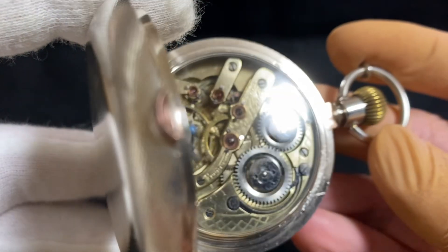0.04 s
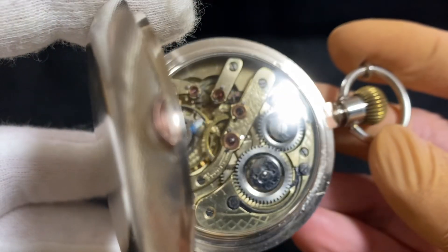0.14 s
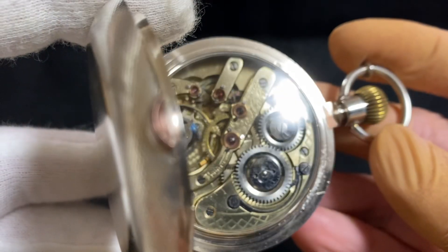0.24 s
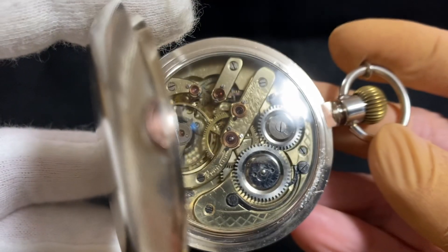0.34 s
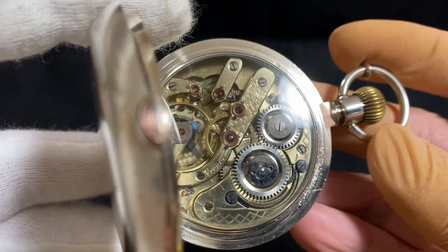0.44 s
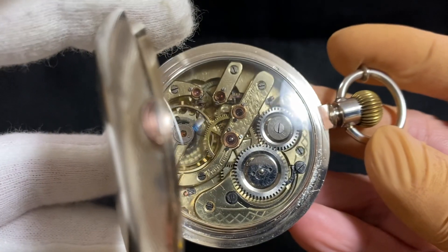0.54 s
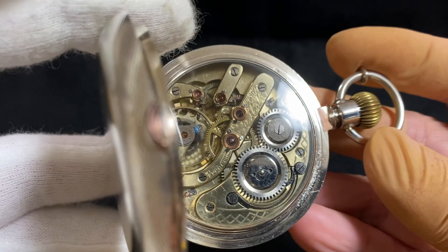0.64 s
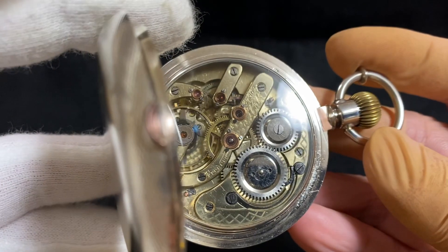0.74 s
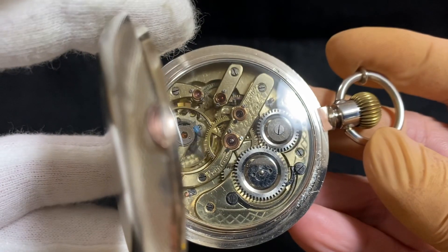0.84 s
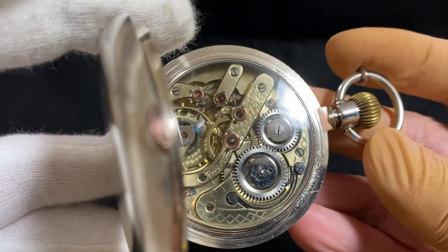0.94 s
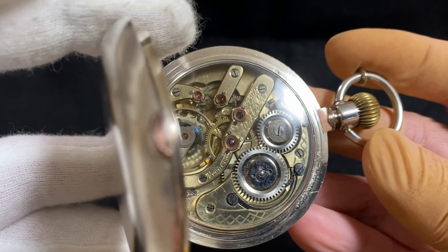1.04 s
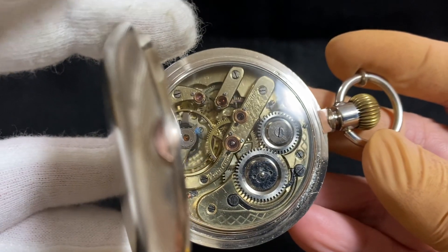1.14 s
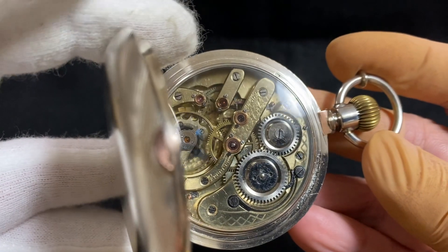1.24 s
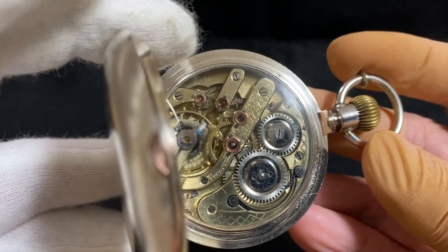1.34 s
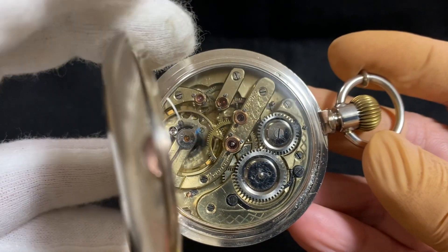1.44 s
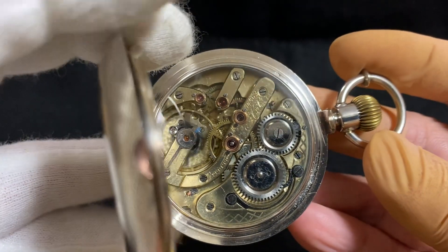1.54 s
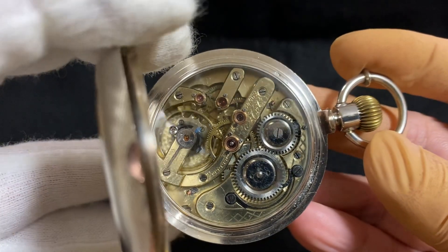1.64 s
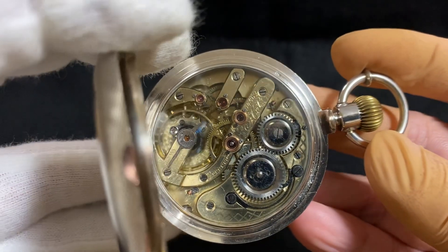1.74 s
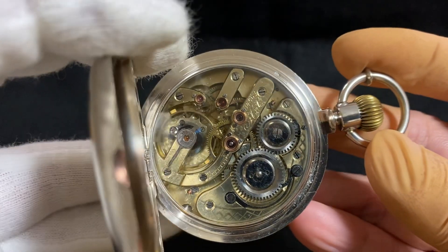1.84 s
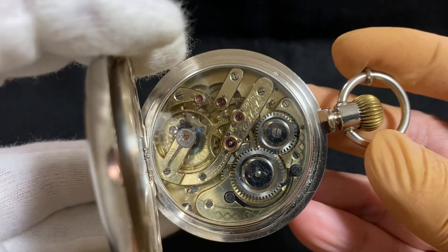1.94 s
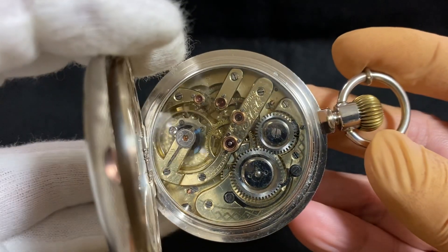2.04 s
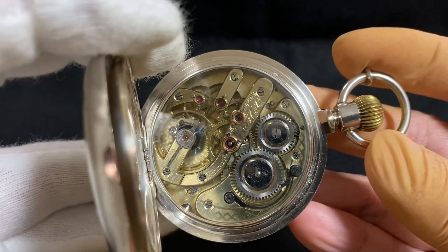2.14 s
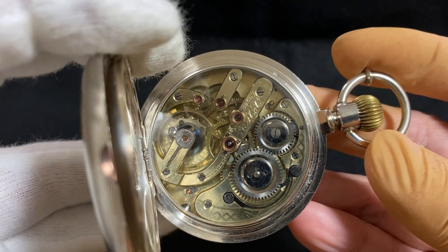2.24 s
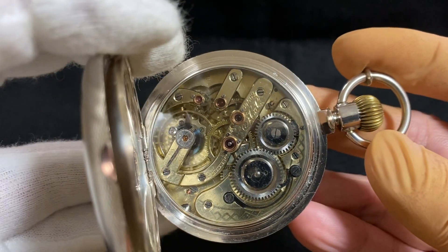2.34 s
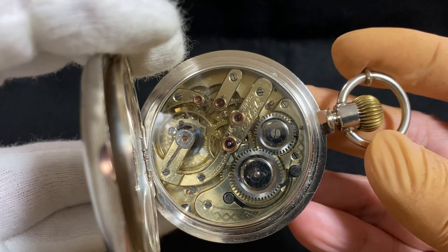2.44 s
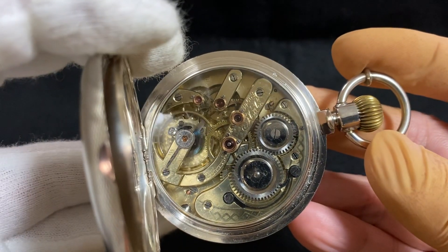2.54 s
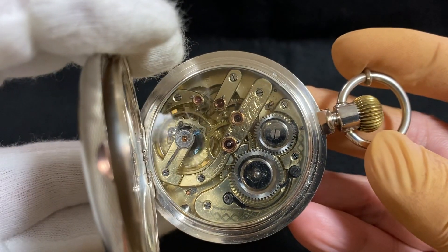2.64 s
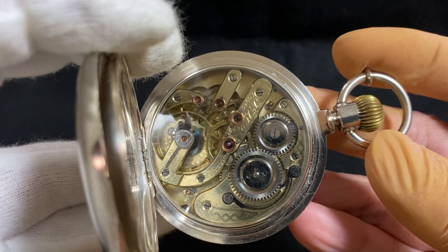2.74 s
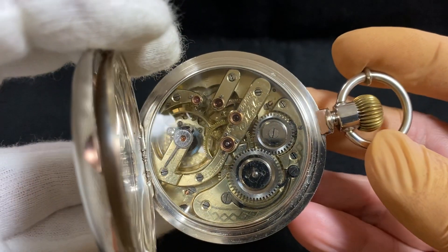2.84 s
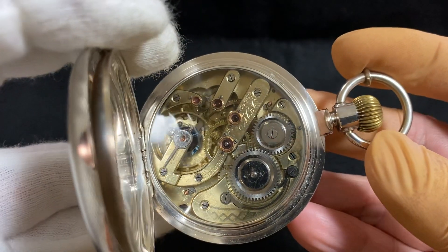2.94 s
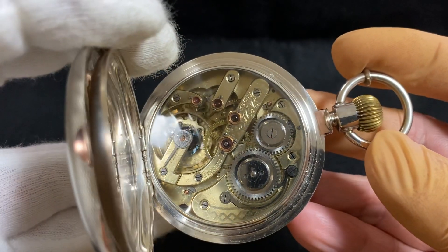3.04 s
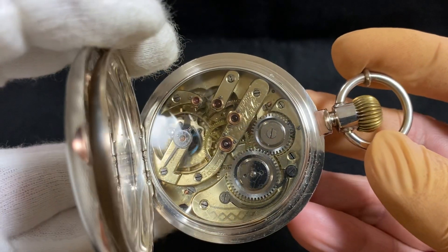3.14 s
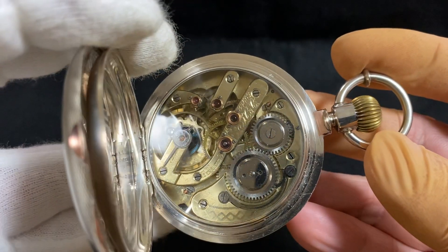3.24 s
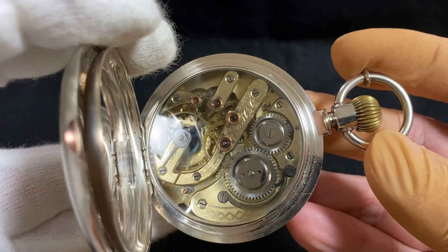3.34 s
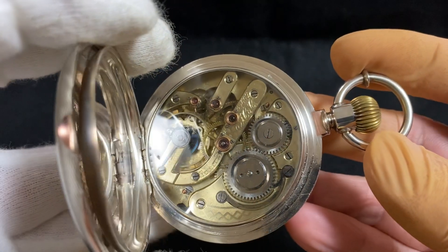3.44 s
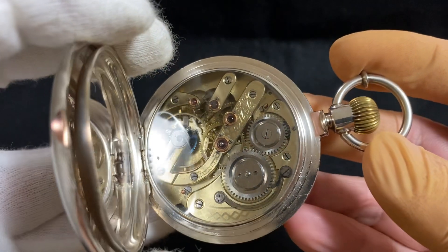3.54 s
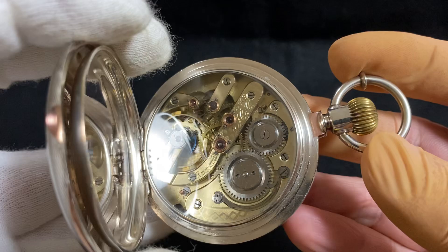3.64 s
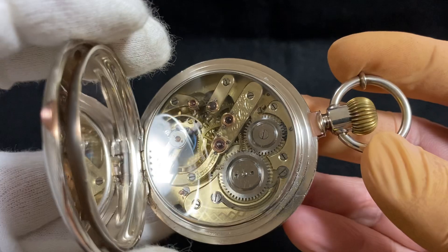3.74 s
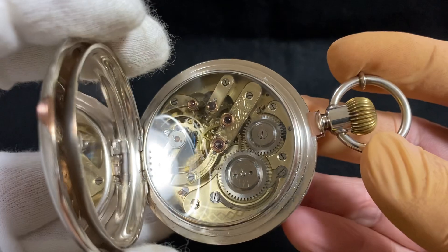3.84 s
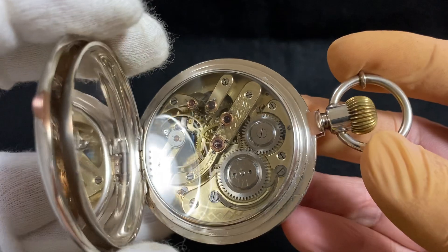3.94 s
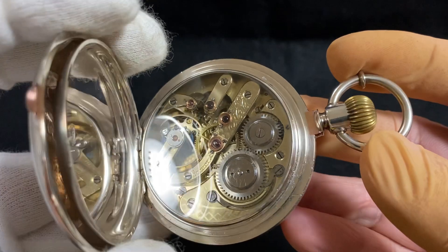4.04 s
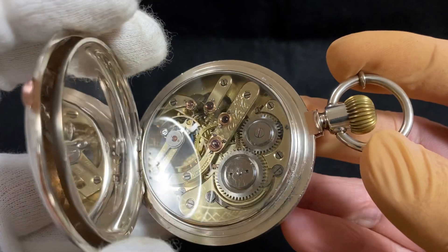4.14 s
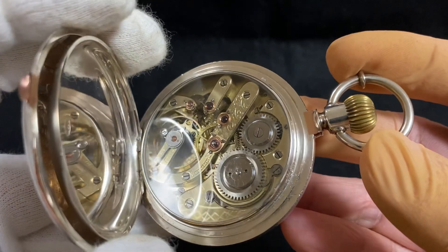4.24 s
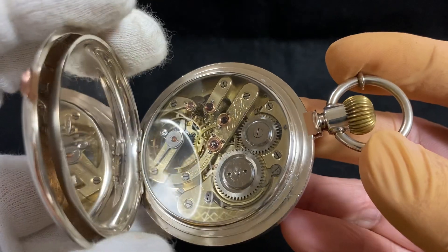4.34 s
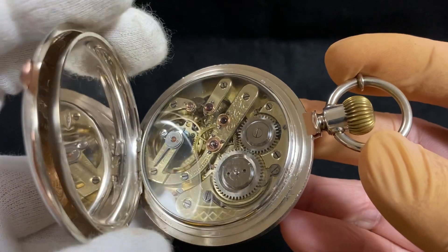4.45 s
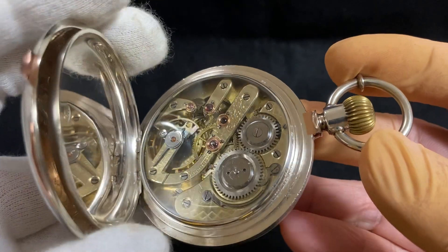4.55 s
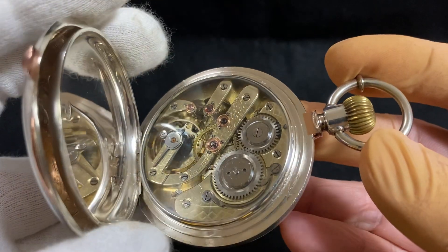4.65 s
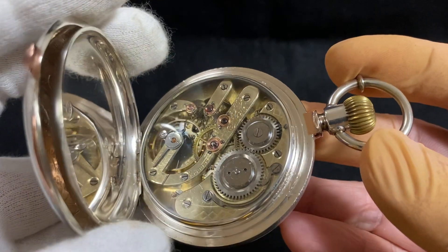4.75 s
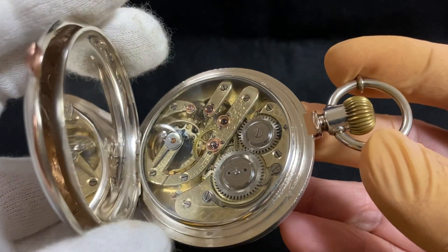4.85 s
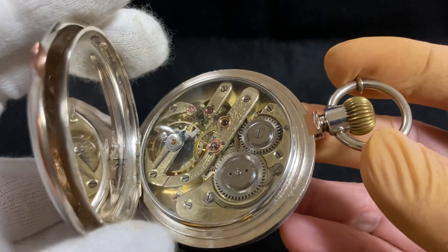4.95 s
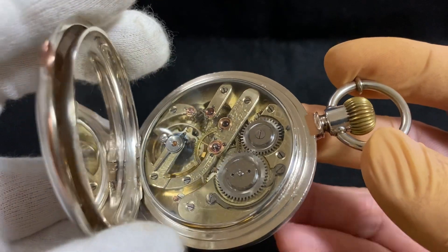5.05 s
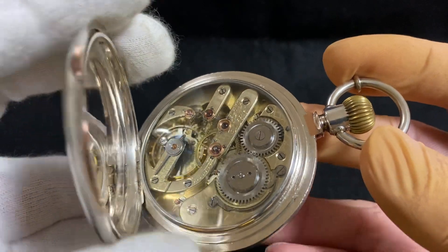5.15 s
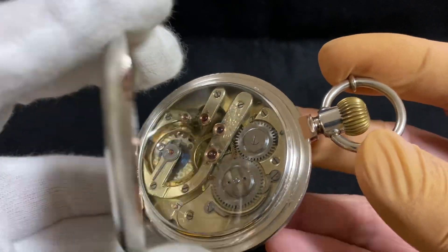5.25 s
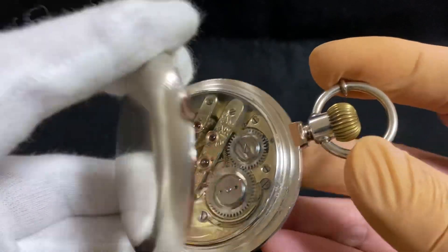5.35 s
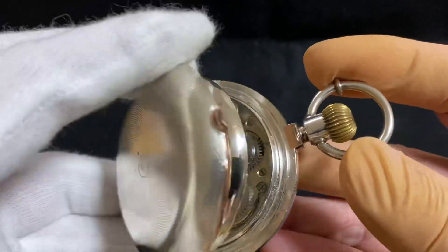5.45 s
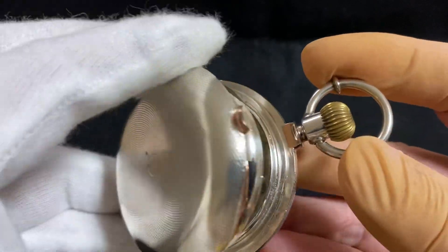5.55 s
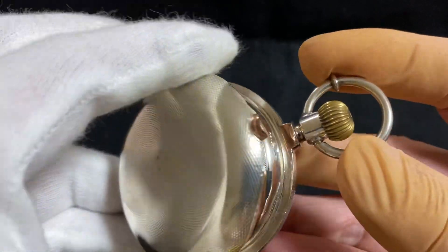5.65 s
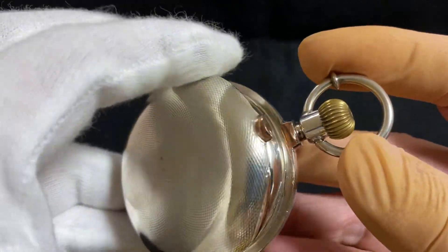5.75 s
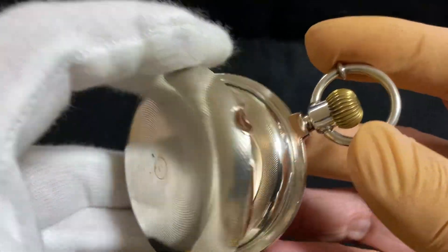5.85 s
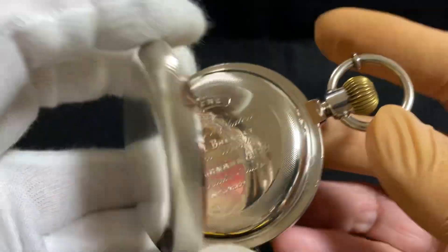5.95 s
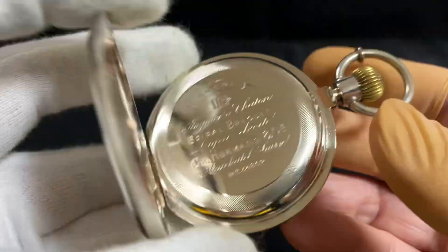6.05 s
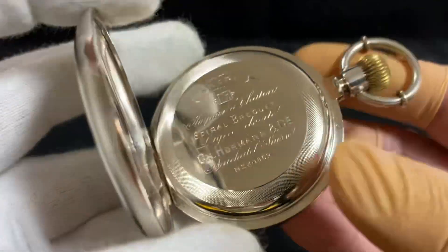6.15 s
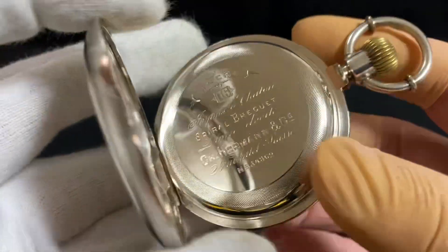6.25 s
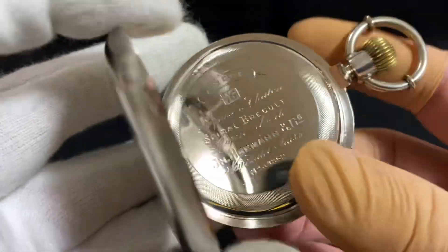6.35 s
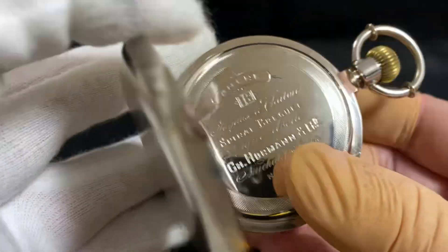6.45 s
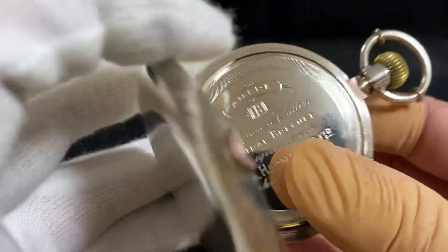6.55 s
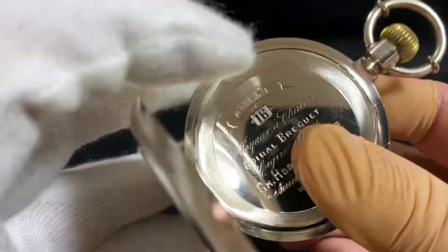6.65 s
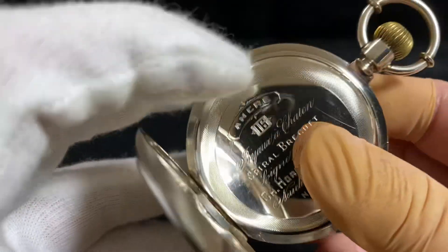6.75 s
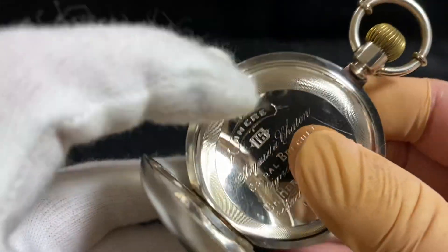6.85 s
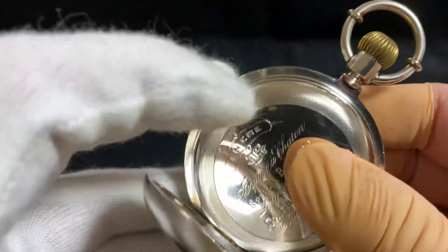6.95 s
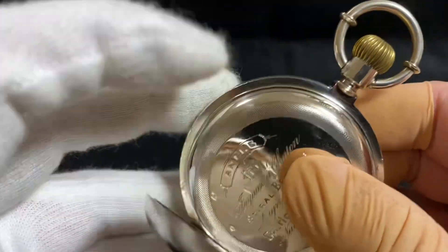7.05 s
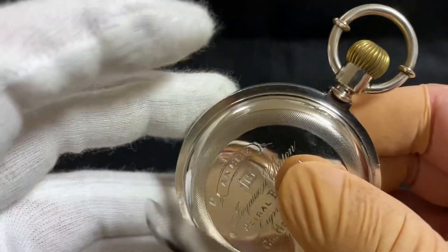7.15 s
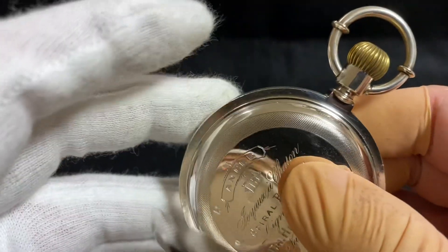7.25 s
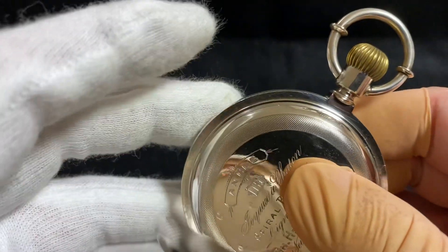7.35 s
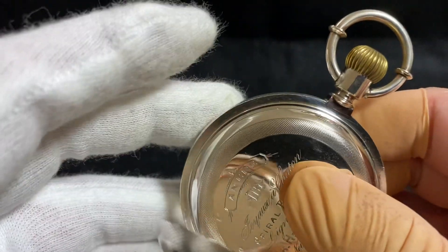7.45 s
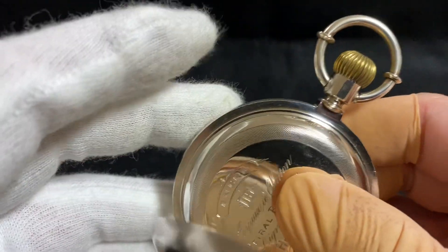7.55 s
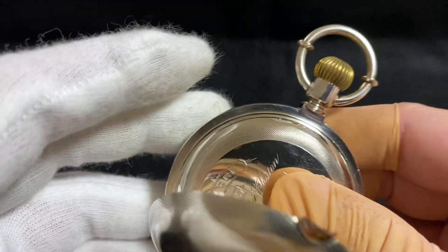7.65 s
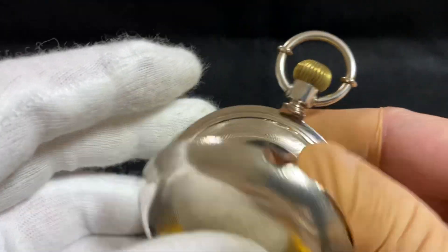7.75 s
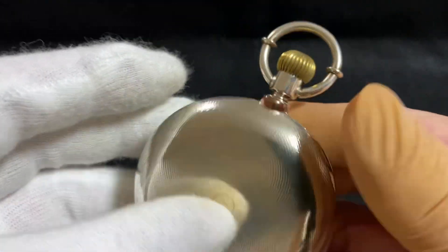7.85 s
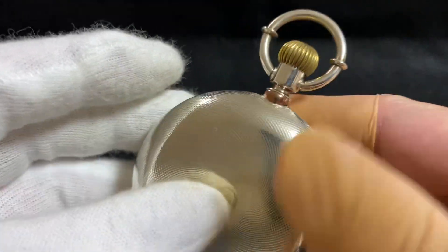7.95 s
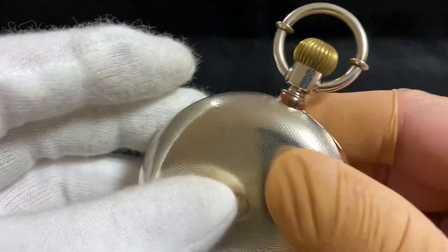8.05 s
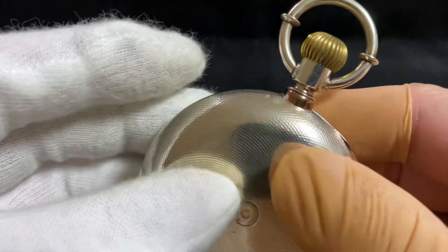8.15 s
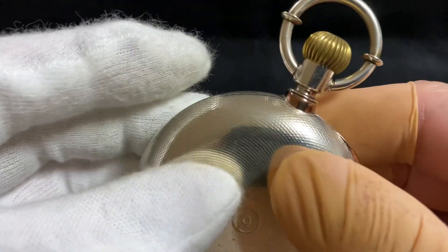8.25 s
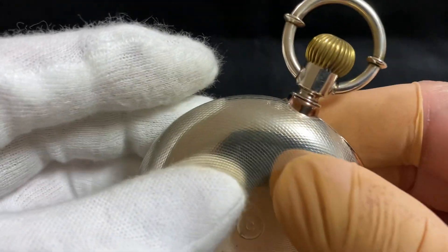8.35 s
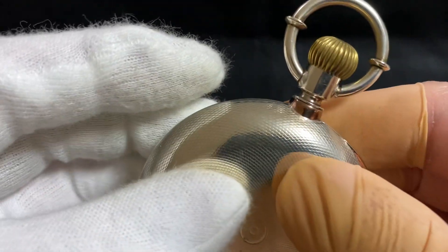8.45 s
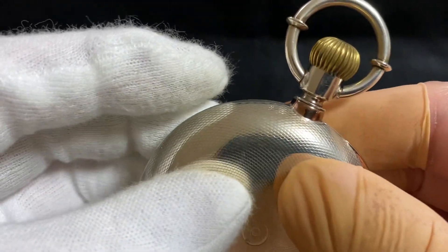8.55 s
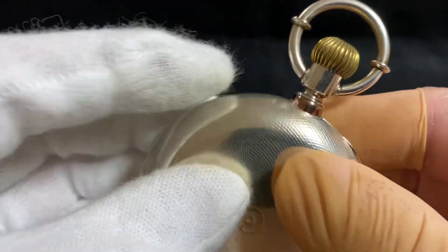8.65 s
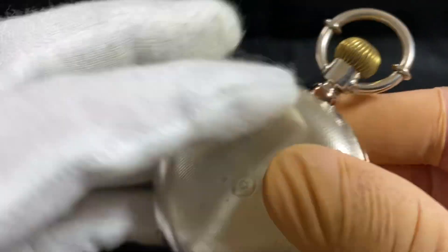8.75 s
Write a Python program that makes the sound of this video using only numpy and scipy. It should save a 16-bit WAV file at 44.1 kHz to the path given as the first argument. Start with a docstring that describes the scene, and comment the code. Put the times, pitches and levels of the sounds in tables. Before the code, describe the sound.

In a quiet room, a low appliance hum near 100 Hz and a soft bassy rush continue throughout. A pocket watch held close to a two-port phone microphone ticks faintly, about five thin, bright beats per second, slightly uneven in pairs. Around 0.45 s there is a slight, dull touch on the case. Ticking alone follows until a metallic click at 5.2 s, then a loud, hard cover snap at 5.6 s with a tight cluster of clacks. A crisp knock comes at 6.1 s, with small taps to 7.0 s and light glove rubbing, strongest near 6.5 s. At 7.24 s a heavy, fuller snap lands with a thud in the palm. A brief scratchy scrape comes around 7.7-7.8 s and a softer one near 8.1 s; a firm, thumping snap hits at 8.4 s, then tiny clicks and rubbing end it at 8.8 s. Snaps leave a short, faint room tail.

```python
"""A quiet room, a pocket watch held close to a phone with two microphone ports, for 8.8 s.
From the start an appliance hums as wavering sines over a bassy rush of shaped noise; the escapement
ticks five times a second, each beat a noise crack and ringing modes. Two early touches on the case;
from 5.2 s gloved fingers knock it and snap its covers, hardest near 5.6, 7.2 and 8.4 s. Rubbing,
grainy noise through case resonances, comes and goes from 5.35 s. A room tail follows the watch."""
import sys
import numpy as np
from scipy import signal
from scipy.fft import rfft, irfft, next_fast_len
from scipy.io import wavfile
from scipy.ndimage import uniform_filter1d

SR = 44100
rng = np.random.default_rng(int(sys.argv[2]) if len(sys.argv) > 2 else 0)


def to_wav(sig):
    """Store sig (one row per channel, or 1-D mono) as 16-bit WAV at the path in sys.argv[1].

    Samples outside -1..1 are clipped; the rate is SR.
    """
    pcm = np.clip(np.atleast_2d(sig), -1, 1) * 32767
    pcm = np.round(pcm).astype(np.int16)
    wavfile.write(sys.argv[1], SR, pcm.T)  # frames by channels


N = 388080

# All table levels are relative, ahead of the gain in record().
# Appliance lines: pitch_hz, level_db
HUM_LINES = [(48, -64), (99.9, -53), (143.8, -59), (199.8, -63)]
# Spectrum of the room's rush: frequency_hz, level_db
AIR_COLOUR = [(20, -30.5), (45, -14), (83, 0.5), (150, -5.5), (250, -8), (575, -24.5), (940, -23.5),
              (1490, -36), (3190, -44), (7000, -52), (10500, -52), (13000, -53.5), (16500, -64)]
# Ringing modes of the watch plates: pitch_hz, level_db, t60_s (before a closing taper)
PLATE_MODES = [(2900, 0.5, 0.02), (3210, -2, 0.13), (3828, -6, 0.031), (5000, -8.5, 0.03),
               (5160, -3, 0.061), (5550, -13, 0.043), (7180, -6.5, 0.011), (8020, -6, 0.056),
               (9600, -5.5, 0.028), (10320, -2, 0.028), (11150, -7.5, 0.03), (12280, -0.5, .05),
               (13700, -3.5, 0.049), (14600, -6, .04), (15100, -5, 0.055)]
# The two beats: level_db, plate_ring_db, unlocking_click_db, low_body_db
TICK_BEAT = (0, 1, -12.5, -8.5)
TOCK_BEAT = (-2.5, 1, -24.5, -12)
# The watch as it is tilted and covered: time_s, lateness_ms, level_db, plate_ring_db
WATCH_HANDLING = [(0, 0.5, -45.5, -2.5), (1.2, -3.5, -49, 3.5), (1.9, -4.5, -49, 5), (2.8, -1.5, -46, 0),
                  (3.3, -4, -43, -2.5), (4.0, -1, -48.5, 9), (4.5, -0.5, -43.5, 5.5), (4.9, 0.1, -47, 5.5),
                  (5.35, 0.5, -40.5, -3.5), (5.7, -1, -41, -11.5), (6.3, 0.2, -45, 5),
                  (6.85, -3.5, -46, -12), (7.299, -2.5, -48, -9), (7.701, -0.5, -44.5, -12.5),
                  (8.101, -1, -43.5, -21), (8.8, -0.5, -51.5, -13.5)]
# Blows on the case: start_s, level_db, firmness_db, brightness_db, ring_db
CASE_BLOWS = [(.4443, -58, -20, -12, 2), (0.4841, -24, -55, -38, -12), (5.1774, -26.5, -22, -3.5, 3),
              (5.434, -57.5, -17, -7.5, 8.5), (5.606, -24.5, -40, -9, -14), (5.6156, -7.5, -23.5, -8, 1.5),
              (5.6197, -6.5, -22, -7, -24), (5.627, -28, -27, -1, -11), (5.6357, -22.5, -13, -1.5, -9),
              (5.643, -26, -12, -1, -8), (6.0116, -58, -12, -16.5, -1.5), (6.1291, -25, -21, -7.5, -8),
              (6.139, -15.5, -27, -27, -14.5), (6.3795, -40, -19, -16.5, 3), (6.5876, -44, -18, -6.5, -9),
              (6.979, -40, -3.5, -9.5, -15), (7.2308, -41, 1, -13.5, -17), (7.2413, -6.5, 1, -3, -8),
              (7.2496, -25, -2, -11, -7), (7.65, -67, -25, 2.5, -16), (7.6826, -63.5, -30, 4, -19),
              (7.7003, -47.5, -10.5, -7, -13), (7.719, -43, 0, -9, -6), (7.751, -53, -2, 0, -13.5),
              (8.059, -54.5, 11, -4, -12), (8.30, -58.5, 7, -4, -12.5), (8.357, -61, -28.5, 4, -23),
              (8.3804, -16, 18.5, 5, -14.5), (8.391, -42, 17, 2, -11.5), (8.403, -28.5, -2.5, -9.5, -18),
              (8.728, -60.5, -17.5, 6, -19), (8.743, -55, 14, -14.5, -11.5), (8.7712, -61.5, -6, 10.5, -13)]
# Ringing modes of the case: pitch_hz, level_db, t60_s (before a closing taper)
CASE_MODES = [(620, -6.5, 0.015), (945, -5.5, 0.038), (1140, -8, 0.018), (1480, -8.5, 0.02),
              (1690, 3, 0.044), (1990, -4.5, 0.1), (2786, -2, .05), (3060, -2, 0.03), (3380, -7.5, 0.062),
              (3590, -6.5, 0.089), (4280, -17, 0.12), (4820, -5, 0.064), (6200, -14, 0.084),
              (6700, -4.5, 0.11), (7050, 0.5, 0.027), (8480, 0, .03), (9250, -7, 0.097),
              (10300, -11.5, 0.075), (13200, -12, 0.044), (13900, -20, .03), (14520, -12.5, .05)]
# Thud in the palm: pitch_hz, level_db, t60_s (before a closing taper)
HAND_MODES = [(97, -5, .05), (142, -7.5, 0.055), (223, -3.5, 0.026), (350, -3, 0.021), (487, 7, 0.0068)]
# Glove on metal, one list per rub: time_s, level_db, brightness_db
GLOVE_RUBS = [
    [(5.35, -87, -5), (5.6, -82, -1)],
    [(5.9, -95, 11.5), (6.2, -76, -2), (6.42, -79, 1), (6.53, -68.5, -1), (6.6, -82.5, 4),
     (6.7, -77.5, 6.5), (6.76, -93.5, 3.5), (7.0, -81, -3.5), (7.1, -95.5, 13)],
    [(7.58, -94, 12.5), (7.685, -83.5, 8.5), (7.7, -64, -15), (7.815, -65, -10), (7.835, -88.5, 5.5),
     (7.9, -91.5, 7)],
    [(8.0, -96, 8.5), (8.07, -71, -3), (8.15, -86.5, 6), (8.25, -86.5, 9.5), (8.3, -78.5, -18.5),
     (8.37, -89, 5)],
    [(8.6, -97.5, 10.5), (8.68, -80, 14.5), (8.75, -79.5, 7.5), (8.8, -89, 5)],
]
# Resonances of the case under the sliding finger: pitch_hz, level_db
SCRAPE_MODES = [(1305, -1.5), (1600, -4.5), (1900, 3), (2740, -6.5), (3290, 0.5), (4390, -3), (5000, -11.5),
                (5700, -8), (7270, -10)]
# Bands of the room tail, with a narrower one where it lingers: low_hz, high_hz, t60_s, level_db
ROOM_BANDS = [(101, 460, .15, -35.5), (500, 1300, 0.33, -30.5), (1620, 4600, 0.29, -26.5),
              (2700, 3000, 0.33, -32), (4930, 9500, 0.26, -22), (9570, 27000, 0.18, -27)]
# Microphone colour on the close watch: frequency_hz, level_db
MIC_COLOUR = [(30, -30.5), (120, -5), (400, 0.5), (2300, -2.5), (3000, 1), (3500, -9), (4100, -4),
              (5500, -6), (7000, -1), (11500, -5), (15600, -2), (16800, -16)]
# The phone's body hides the watch from the far port: frequency_hz, level_db
BODY_SHADE = [(100, 3), (300, 0), (450, 0), (700, -5), (1200, -7), (2800, -7), (4000, 0)]
# Phase shift of the watch at the far port: frequency_hz, phase_rad
BODY_TURN = [(40, -.2), (250, -.6), (450, -.9), (650, -1.6), (950, .5), (1400, -.8), (2000, -1.3),
             (2800, -.5), (4200, .1), (5500, -.5), (6200, 0)]
# Share of the room's sound common to both ports: frequency_hz, level_db
SHARED_LEVEL = [(150, 0), (300, -4), (450, -12), (700, -6), (1400, -8), (2000, -12), (6000, -4), (7000, 0)]
# Phase shift of that share at the far port: frequency_hz, phase_rad
SHARED_PHASE = [(50, -.3), (150, -.35), (200, .3), (300, -.8), (450, -.6), (650, 2.4), (950, 1.8),
                (1400, 3.2), (2000, 0)]
# Colour of the far port below the split: frequency_hz, level_db
FAR_PORT = [(30, -2), (100, -5.5), (400, -5), (1000, -4), (2800, -6), (4200, -4), (5600, -5)]

LEAD = 441  # samples of room for a filter's rise
RING_S = .1  # longest ring of the watch
AIR_DB = -62.8
SWING_S, FIRST_S = .39783, .1091  # one swing of the balance there and back; first tick before lateness
TOCK_S = .1857  # out of beat: the tock follows the tick sooner than half a swing
UNLOCK_S = .0245  # the fork unlocks this long before the tooth drops
BEAT_SCATTER_DB = 1
RATTLE_S, RATTLE_S_PER_DB = .008, -.00008  # a firm press chokes the rattle sooner
THUD_DB, THUD_SLOPE = -11, .95  # the thud grows with firmness
HOLLOW_DB, HOLLOW_SLOPE = -5, .3  # so does the hollow band under the main ring
THUD_LATE_S = .0018  # the palm answers a moment after the metal
LOW_DB = -7  # the band under the bass peak of a press
TREBLE_DB = -3  # treble against the edge
SCRAPE_WIDTH_HZ = 100
SPLIT_HZ, LAG = 6600, 10  # far-port treble split; its lead in samples
TOP_HZ = 16900  # upper limit of the microphone


def undb(db):
    """Decibels to an amplitude factor."""
    return 10 ** (np.asarray(db) / 20)


def fade(t, t60):
    """Exponential decay, 60 dB down after t60 seconds."""
    return np.exp(-np.log(1000) * t / max(t60, 1e-3))


def shaped(x, points, turn=((1, 0), (2, 0))):
    """Colour by (Hz, dB) points, and turn the phase by (Hz, rad) points, on a log-frequency axis."""
    size = next_fast_len(len(x))
    log_f = np.log(np.arange(size // 2 + 1) * SR / size + 1)

    def curve(pairs):
        hz, value = np.transpose(pairs)
        return np.interp(log_f, np.log(hz), value)

    response = undb(curve(points)) * np.exp(1j * curve(turn))
    return irfft(rfft(x, size) * response, size)[:len(x)]


def unit(x):
    """Scale to an rms of one."""
    return x / np.sqrt(np.mean(x ** 2))


def walk(rate):
    """Random levels, each held 1 / rate s, then smoothed twice into slopes."""
    hold = int(SR / rate)
    steps = np.repeat(rng.standard_normal(N // hold + 1), hold)
    return uniform_filter1d(uniform_filter1d(steps, hold), hold)[:N]


def add(out, s, x):
    """Mix x into out, starting at s seconds."""
    i = int(s * SR)
    out[i:i + len(x)] += x[:N - i]


def modal(modes, scatter_db, beat_hz):
    """One answer of a set of modes, a little different at each blow; split modes of the round case throb."""
    t = np.arange(int(SR * RING_S), dtype=np.float32) / np.float32(SR)
    hz, db, t60 = np.float32(np.transpose(modes))[:, :, None]
    draws = np.float32(rng.standard_normal((len(modes), 3)))
    level_draw, pitch_draw, throb_draw = draws.T[:, :, None]
    throb = np.cos(2 * np.pi * beat_hz * throb_draw * t)
    decay = np.exp(-t * np.float32(np.log(1000)) / t60) * (1 - t / RING_S)
    tone = np.sin(2 * np.pi * hz * (1 + 0.007 * pitch_draw) * t)
    ring = np.sum(undb(db + scatter_db * level_draw) * decay * throb * tone, axis=0)
    return ring / np.abs(ring).max()


def strike(modes, rattle_s, ring_db, colour):
    """A rattle of noise that stops short, and the ring that builds up during it; starts LEAD samples in."""
    t = np.arange(int(SR * RING_S)) / SR
    rattle = rng.standard_normal(len(t)) * undb(-60 * (t / rattle_s) ** 2)
    spectrum = rfft(np.pad(rattle, LEAD))
    power = np.abs(spectrum) ** 2
    # even out the burst's spectrum, so each crack keeps its given colour
    levelling = np.sqrt(power.mean() / uniform_filter1d(power, size=60))
    crack = irfft(spectrum * levelling, len(t) + 2 * LEAD)
    crack[:LEAD] = 0
    ring = (1 - fade(t, rattle_s / 2)) * modal(modes, scatter_db=3, beat_hz=20)
    return shaped(crack + np.pad(2 * undb(ring_db) * ring, LEAD), colour)


def appliance():
    """Motor and mains lines behind the watch: sines that waver a little in level and pitch."""
    t = np.arange(N) / SR
    out = np.zeros(N)
    for hz, db in HUM_LINES:
        level = undb(db - 2.5 + 2.2 * walk(11))
        out += level * np.sin(2 * np.pi * hz * t + 3.1 * walk(7.3))
    return out


def air():
    """The room's steady rush, mostly bass: shaped noise whose level drifts slightly."""
    return undb(AIR_DB + 0.39 * walk(5.3)) * unit(shaped(rng.standard_normal(N), AIR_COLOUR))


def escapement():
    """Each beat is a faint unlocking click, then the drop of the tooth; both thin and bright."""
    out = np.zeros(N)
    when, late_ms, watch_db, watch_ring_db = np.transpose(WATCH_HANDLING)
    for swing in np.arange(FIRST_S, N / SR - SWING_S / 2, SWING_S):
        for s, beat in ((swing, TICK_BEAT), (swing + TOCK_S, TOCK_BEAT)):
            db, ring_db, unlock_db, body_db = beat
            level_scatter, body_scatter, unlock_scatter = BEAT_SCATTER_DB * rng.standard_normal(3)
            drop_db = db + np.interp(s, when, watch_db) + level_scatter
            click_db = drop_db + unlock_db + unlock_scatter
            ring_db = ring_db + np.interp(s, when, watch_ring_db)
            drop_s = s + np.interp(s, when, late_ms) / 1000
            colour = [(1800, body_db - 32.5), (3000, body_db + body_scatter), (5000, -8),
                      (8000, -4.0), (11000, -2.5), (16000, -6)]
            for at, at_db in ((drop_s, drop_db), (drop_s - UNLOCK_S, click_db)):
                blow = strike(PLATE_MODES, 0.0085, ring_db, colour)
                add(out, at - LEAD / SR, undb(at_db) * blow)
    return out


def covers():
    """Knocks and snaps ring the case; a firm press adds bass and a thud through the hand."""
    out = np.zeros(N)
    for s, db, firm_db, bright_db, ring_db in CASE_BLOWS:
        hollow_db = HOLLOW_DB + HOLLOW_SLOPE * firm_db
        colour = [(300, firm_db - 21), (750, firm_db + LOW_DB), (1050, firm_db), (1900, hollow_db),
                  (2900, 0), (5500, bright_db), (11000, bright_db + TREBLE_DB)]
        rattle_s = RATTLE_S + RATTLE_S_PER_DB * firm_db
        add(out, s - LEAD / SR, undb(db) * strike(CASE_MODES, rattle_s, ring_db, colour))
        thud_db = db + THUD_DB + THUD_SLOPE * firm_db
        add(out, s + THUD_LATE_S, undb(thud_db) * modal(HAND_MODES, scatter_db=1, beat_hz=0))
    return out


def glove():
    """Cloth fibres catch on the metal: grainy hiss and lone snags ring the case under a brighter fizz."""
    t = np.arange(N) / SR
    snags = (rng.random(N) < 60 / SR) * rng.exponential(8., N)  # about 60 per second
    grain = (rng.standard_normal(N) + snags) * undb(3 * walk(200) + 1.5 * walk(30))
    rasp = np.zeros(N)
    for hz, db in SCRAPE_MODES:
        b, a = signal.iirpeak(hz, hz / SCRAPE_WIDTH_HZ, SR)
        rasp += undb(db) * signal.lfilter(b, a, grain)
    hiss = unit(shaped(grain, [(700, -30), (1400, 0), (3000, -3), (6000, -8), (9000, -30)]))
    dull = unit(unit(rasp) + undb(-13) * hiss)
    bright = unit(shaped(grain, [(4000, -13), (7000, -5.0), (11000, 3.0), (16000, -9.5)]))
    out = np.zeros(N)
    for rub in GLOVE_RUBS:
        s, db, bright_db = np.transpose(rub)
        edge = np.clip(np.minimum(t - s[0], s[-1] + 0.018 - t) / 0.025, 0, 1)
        fizz = undb(np.interp(t, s, bright_db)) * bright
        out += edge * undb(np.interp(t, s, db)) * (dull + fizz)
    return out


def room(x):
    """A diffuse tail of noise bands, each dying at its own rate."""
    t = np.arange(int(SR * .55)) / SR
    tail = np.zeros(len(t))
    for lo_hz, hi_hz, t60, db in ROOM_BANDS:
        band = [(lo_hz / 2, -40), (lo_hz, 0), (hi_hz, 0), (hi_hz * 2, -40)]
        noise = unit(shaped(rng.standard_normal(len(t)), band))
        # equal energy for long and short decays
        decay = fade(t, t60) / np.sqrt(t60 * SR / (2 * np.log(1000)))
        tail += undb(db) * decay * noise
    return signal.fftconvolve(x, tail * np.clip(t / .004, 0, 1))[:N]


def scene():
    """The close watch and the room behind it, as they reach the near and the far port."""
    behind = appliance() + air()
    watch = shaped(escapement() + covers() + glove(), MIC_COLOUR)
    near = watch + room(watch) + behind
    # the far port hears its own reflections, and part of the rush on its own
    own_colour = [(30, -8), (100, -8), (250, -4), (500, -.5), (1500, -2), (5000, 0), (7000, -12)]
    own_rush = shaped(air(), own_colour)
    far_watch = shaped(watch + room(watch), BODY_SHADE, BODY_TURN)
    far = far_watch + shaped(behind, SHARED_LEVEL, SHARED_PHASE) + own_rush
    return np.array([near, far])


def record(dry):
    """Two ports: the right is weaker in the bass; its treble arrives earlier and inverted; peaks are rounded."""
    low = shaped(dry[1], FAR_PORT + [(SPLIT_HZ - 300, 0), (SPLIT_HZ + 300, -80)])
    high = shaped(dry[1], [(SPLIT_HZ - 300, -80), (SPLIT_HZ + 300, 0)])
    pair = undb(5.0) * np.array([dry[0], low - np.roll(high, -LAG)])
    top_cut = signal.ellip(12, .2, 100, TOP_HZ, fs=SR, output="sos")
    return signal.sosfilt(top_cut, np.tanh(pair))


dry = scene()
out = record(dry)
to_wav(out)
```